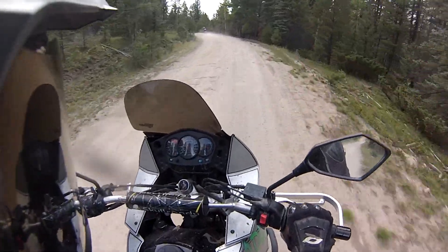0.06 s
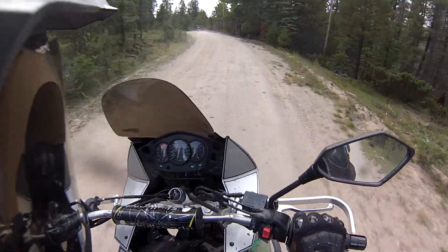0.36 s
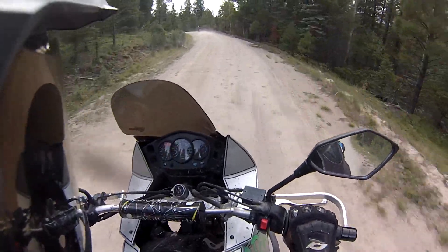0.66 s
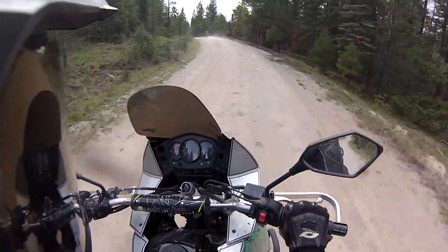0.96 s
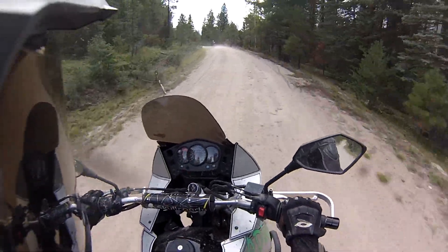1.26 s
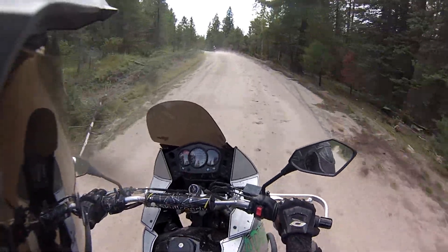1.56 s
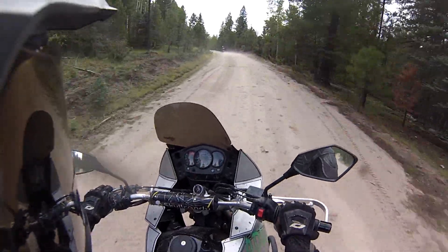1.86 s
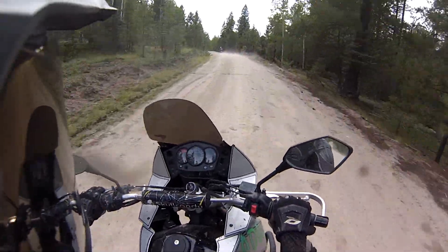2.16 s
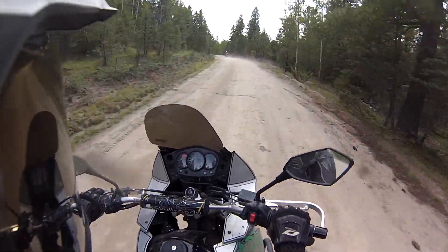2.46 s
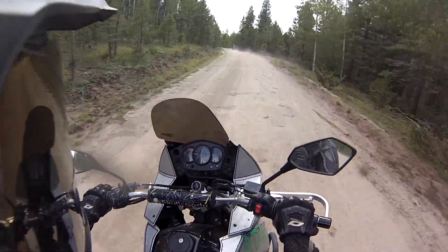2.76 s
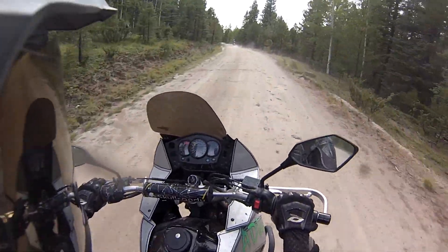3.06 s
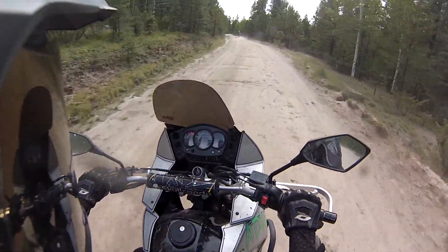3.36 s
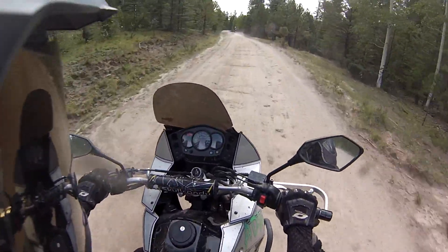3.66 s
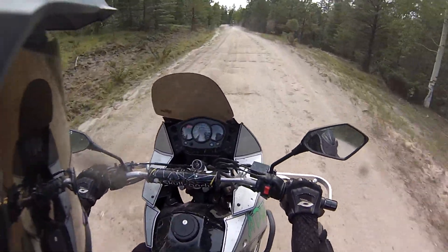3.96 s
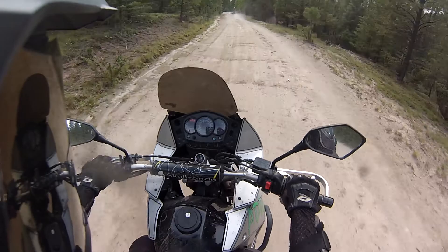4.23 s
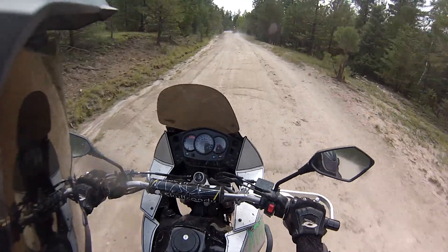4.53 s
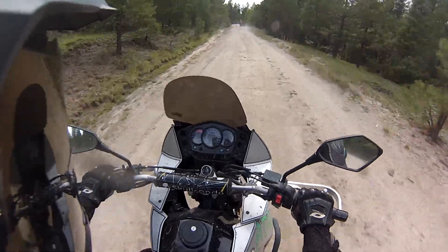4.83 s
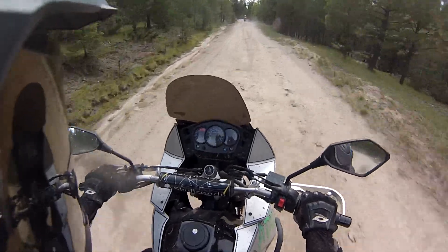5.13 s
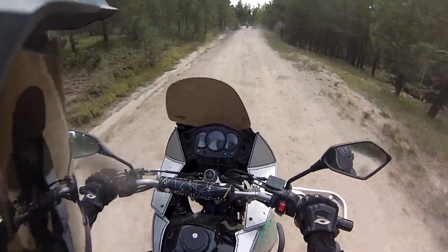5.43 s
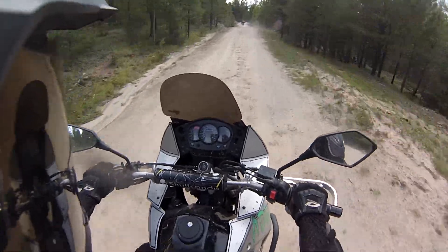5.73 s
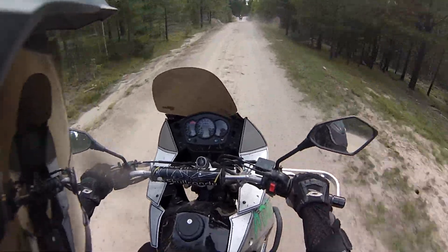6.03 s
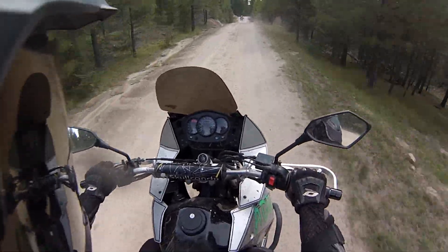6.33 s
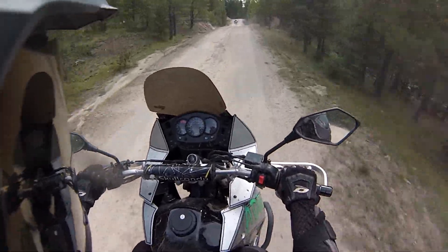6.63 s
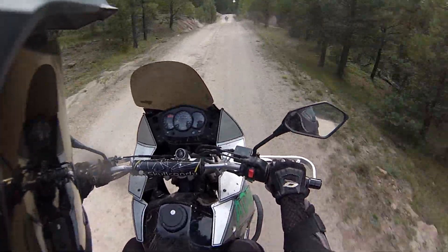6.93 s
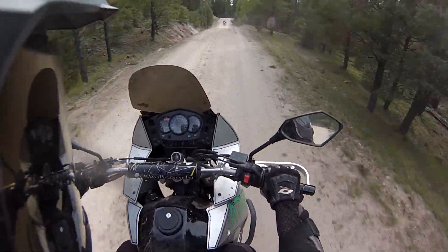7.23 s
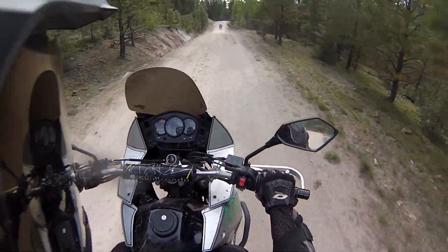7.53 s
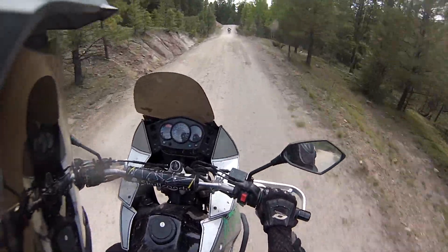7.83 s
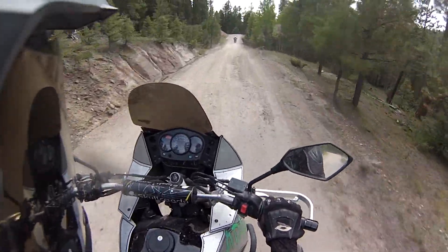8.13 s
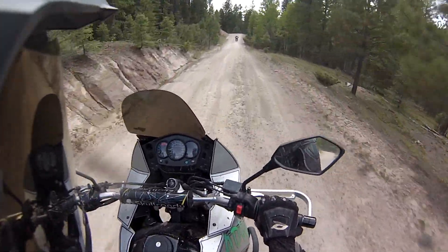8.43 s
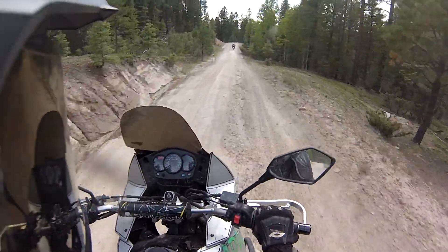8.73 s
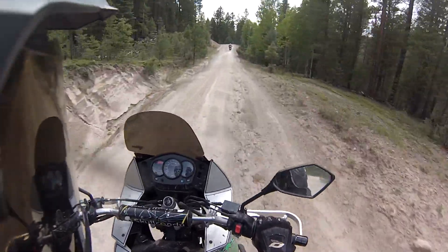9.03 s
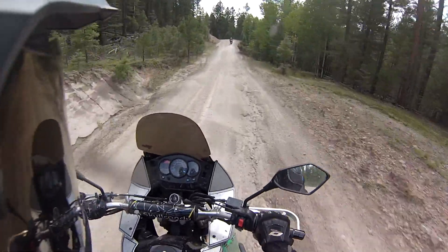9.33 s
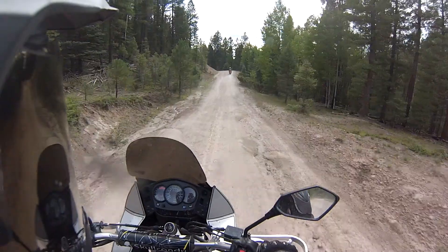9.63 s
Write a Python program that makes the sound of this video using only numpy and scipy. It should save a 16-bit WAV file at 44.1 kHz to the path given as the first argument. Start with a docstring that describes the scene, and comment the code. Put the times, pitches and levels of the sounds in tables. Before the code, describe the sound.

Heard from a rider's helmet, low fluttering wind and a rush of air cover the steady hum of a motorcycle on a dirt road. The wind builds after about three seconds into heavy buffeting with hiss and a hollow tone, then drops back. Short, light plastic rattles and knocks follow over bumps, with a few faint high ticks, before the wind thumps harder once more.

```python
"""A single-cylinder motorcycle cruises along a gravel forest road, heard from a camera on the helmet.
From the start the engine drones at an even pitch, vortices off the windscreen thump the microphone,
and one airflow drives rumble, rush, hiss and a hollow hoot. The wind is strongest from about 3 to 6 s.
Small bright ticks come near 5 s; then, as the air eases, the fairing chatters over rough ground.
Two more ticks sound near 9 s, and the buffeting swells again at the end."""
import sys
import numpy as np
from scipy.fft import rfft, irfft, next_fast_len
from scipy.io import wavfile
from scipy.ndimage import uniform_filter1d, map_coordinates

SR = 44100
rng = np.random.default_rng(int(sys.argv[2]) if len(sys.argv) > 2 else 0)


def pcm_store(signal):
    """Save signal as 16-bit PCM."""
    levels = np.round(np.clip(np.atleast_2d(signal), -1, 1) * 32767)
    wavfile.write(sys.argv[1], SR, levels.astype(np.int16).T)


N = 427329


def amp(db):
    """Amplitude ratio of a level in decibels."""
    return 10 ** (np.asarray(db) / 20)


def unit(x):
    """Normalisation to rms 1."""
    return x / np.sqrt(np.mean(x ** 2) + 1e-20)


def curves(rows):
    """Linear interpolation, per sample, of each column after the time."""
    times, *columns = np.transpose(rows)
    return [np.interp(np.arange(N) / SR, times, column) for column in columns]


def swells(rows):
    """Superposed Gaussian rises, in dB, from rows of (time [s], rise [dB], half-width [s])."""
    t = np.arange(N) / SR
    return sum(db * np.exp(-((t - s) / width) ** 2) for s, db, width in rows)


def wobble(rate):
    """Smooth random modulation: a spline through rate knots a second."""
    return map_coordinates(rng.standard_normal(int(N * rate / SR) + 4), [np.arange(N) * rate / SR])


def filtered(x, response):
    """Linear filtering: the spectrum of x times a frequency response."""
    size = next_fast_len(N + 8192)
    return irfft(rfft(x, size) * response(np.fft.rfftfreq(size, 1 / SR)), size)[:N]


def coloured(x, spectrum):
    """Spectral shaping by (frequency [Hz], level [dB]) points on a log axis, at rms 1."""
    hz, db = np.transpose(spectrum)
    return unit(filtered(x, lambda f: amp(np.interp(np.log(f + 1), np.log(hz), db))))


def noise(spectrum):
    """Gaussian noise with the given spectrum, at rms 1."""
    return coloured(rng.standard_normal(N), spectrum)


def blown(modes):
    """Forced resonance: steep-sided modes driven by white noise, at rms 1."""
    def response(f):
        return sum(amp(db) * np.abs(f * width / (hz * hz - f * f + 1j * f * width)) ** 2
                   for hz, width, db in modes)
    return unit(filtered(rng.standard_normal(N), response))


def steadied(x, seconds):
    """Division by the running rms evens out swells slower than the given time."""
    power = uniform_filter1d(x ** 2, max(int(seconds * SR), 8))
    return x / np.sqrt(np.abs(power) + 1e-6)


def driven(flow_db, cruise_db, exponent):
    """Power law of flow noise: amplitude grows as a power of the flow."""
    return amp(cruise_db + exponent * flow_db)


def airflow():
    """Unsteady flow, in dB over cruise: a drifting mean plus gusts and slight turbulence."""
    # mean flow over the helmet: (time [s], level [dB])
    mean_flow = [(0, -41.0), (1.3, -41.0), (2.8, -35.5), (3.05, -37.0), (4.45, -33.5), (5.0, -38.5),
                 (5.45, -41.5), (6.0, -36.0), (6.55, -46), (7.0, -43.5), (7.25, -48.5), (7.45, -45.5),
                 (8.2, -46.5), (9.55, -43.5), (9.69, -40)]
    # gusts (+) and lulls (-): (time [s], rise [dB], half-width [s])
    gusts = [(2.79, 1.5, 0.067), (4.17, 1, 0.02), (5.16, 2.5, .025), (5.34, 2.5, .02), (5.5, 3.5, 0.053),
             (5.72, 2, 0.017), (6.56, -2, .03), (7.38, 2.5, 0.049), (7.66, 2, .04)]
    cruise_db = -38.5
    mean_db, = curves(mean_flow)
    return mean_db - cruise_db + swells(gusts) + 0.51 * wobble(11)


def engine():
    """Four-stroke cycle: the piston shakes once a turn, the exhaust fires every second turn."""
    # piston drone: (time [s], level [dB])
    drone_levels = [(0, -50), (0.6, -45), (1.5, -38.5), (2.2, -44), (2.7, -36.0), (3.1, -46), (4.0, -40),
                    (4.6, -31), (5.35, -31), (5.9, -36), (6.6, -41.5), (7.15, -32.5), (7.7, -36.5),
                    (8.7, -39), (9.69, -39.5)]
    # exhaust response: (frequency [Hz], relative level [dB])
    exhaust_spectrum = [(20, -27), (35, -9), (70, -1), (105, -11), (140, 4.5), (175, -5.5), (245, -0.5),
                        (315, 0), (385, 1), (500, -15.5), (1200, -9.5), (4000, -55)]
    # steady whirr of gears and tyres: (frequency [Hz], relative level [dB])
    whirr_spectrum = [(200, 5), (620, 2.5), (850, 3), (1200, 2.5), (1650, -6), (2400, 0.5), (3100, -12),
                      (4500, -16.5), (7200, -13), (8500, -22), (10300, -25.5), (10900, -17.5),
                      (11700, -24.5), (15200, -28)]
    crank_hz, pulse_db, puff_db = 69.8, -56, -51
    drone_db, = curves(drone_levels)
    turns = np.cumsum(crank_hz * (1 + .002 * wobble(6))) / SR
    drone = np.sqrt(2) * np.sin(2 * np.pi * turns) * amp(drone_db + wobble(7))
    firings = np.diff(np.floor(turns / 2), prepend=0) * amp(0.39 * wobble(35))
    puffs = uniform_filter1d(firings, int(.008 * SR)) * rng.standard_normal(N)
    exhaust = amp(pulse_db) * coloured(firings, exhaust_spectrum)
    exhaust += amp(puff_db) * coloured(puffs, exhaust_spectrum)
    whirr = amp(-52.5 + 0.3 * np.sin(np.pi * turns) + 0.97 * wobble(150)) * noise(whirr_spectrum)
    return drone + exhaust + whirr


def buffeting():
    """Vortex shedding: the windscreen casts off uneven vortices at a wandering rate, amid turbulence."""
    # wake on the microphone: (time [s], level [dB])
    wake_levels = [(0, -31.5), (1.4, -32.5), (2.2, -33.5), (2.95, -22), (3.6, -23), (4.35, -23.5),
                   (4.7, -19.0), (5.2, -19.5), (5.5, -25), (6.15, -22.5), (6.45, -36.5), (7.0, -27.5),
                   (7.45, -34.5), (8.0, -30), (8.95, -32), (9.69, -19.5)]
    # single big vortices: (time [s], rise [dB], half-width [s])
    thumps = [(1.73, 9, .06), (3.91, 5, 0.035), (4.18, 9.5, 0.04), (4.67, 6, 0.055), (9.28, 9, 0.049),
              (9.61, 8, 0.036)]
    # wake turbulence: (frequency [Hz], relative level [dB])
    wake_spectrum = [(8, -15), (16, 3), (24, 12.5), (34, 8.5), (44, -3), (56, -5), (80, -17), (160, -72)]
    wake_db, = curves(wake_levels)
    shed_hz = 32 + 2 * wobble(9) + 2.43 * wobble(60)
    vortices = np.sqrt(2) * np.sin(2 * np.pi * np.cumsum(shed_hz) / SR) * amp(2.9 * wobble(15))
    turbulence = steadied(noise(wake_spectrum), seconds=0.194)
    return amp(wake_db + swells(thumps)) * (amp(-2.5) * vortices + amp(-5.0) * turbulence)


def helmet_rumble(flow_db):
    """Turbulent wall pressure: eddies on the shell give a rumble and a hollow midrange."""
    # big eddies (+) and calm pockets (-): (time [s], rise [dB], half-width [s])
    eddies = [(.75, -1.5, .12), (2.76, 5, 0.077), (3.03, -3, 0.074), (4.25, 3.5, .14), (5.0, -4, 0.075),
              (5.6, -4.5, .12), (5.87, 0, .06), (6.35, 3.5, 0.11), (7.06, 7, 0.096), (7.22, -4, 0.036)]
    # low and middle bands on the shell: (frequency [Hz], relative level [dB])
    rumble_spectrum = [(35, -18), (50, -4), (66, -5.5), (85, 1.5), (102, -0.5), (125, -6.5), (150, -18.5),
                       (220, -21.5), (500, -83)]
    hollow_spectrum = [(90, -26), (150, -7.5), (178, 0), (205, -2.5), (255, -0.5), (325, -9), (400, -10),
                       (480, -8), (540, -12.5), (600, -9), (680, -17), (820, -19), (1500, -74),
                       (4000, -100)]
    eddy_db = swells(eddies)
    rumble = driven(flow_db, cruise_db=-35, exponent=0.79) * amp(eddy_db + 1.33 * wobble(9))
    rumble *= steadied(noise(rumble_spectrum), seconds=0.13)
    hollow = driven(flow_db, cruise_db=-42.5, exponent=0.7) * amp(0.4 * eddy_db + 0.55 * wobble(12))
    hollow *= noise(hollow_spectrum)
    return rumble + hollow


def cavity_hoot(flow_db):
    """Cavity resonance: a hollow hoots in the flow and surges when it catches the air."""
    # cavity mode: (frequency [Hz], bandwidth [Hz], relative level [dB])
    cavity_modes = [(385.5, 34, 0)]
    # surges: (time [s], rise [dB])
    surges = [(.1, 7), (.35, 4.5), (2.34, 4), (2.78, 7), (2.87, 6), (2.97, 9), (3.32, 11), (3.97, 5.5),
              (4.24, 8.5), (4.78, 4.5), (4.91, 8), (5.15, 7), (5.34, 4), (7.1, 10.5), (7.91, 4)]
    half_width_s = 0.034
    surge_db = swells([(s, db, half_width_s) for s, db in surges])
    gain = driven(flow_db, cruise_db=-45.5, exponent=0.57) * amp(surge_db + 1.44 * wobble(18))
    return gain * steadied(blown(cavity_modes), seconds=0.12)


def slipstream(flow_db):
    """Aerodynamic noise: rushing air rings the housing; faster flow hisses and sings at gap and edge."""
    # broadband air noise: (frequency [Hz], relative level [dB])
    rush_spectrum = [(250, -17.5), (600, -15.5), (720, -8), (820, -11.5), (960, -3), (1200, 1), (1500, -2),
                     (1680, -1), (1950, -1.5), (2300, -1), (2650, -9), (3400, -19), (4500, -24.5),
                     (14000, -89)]
    hiss_spectrum = [(1500, -20), (2900, 9.5), (3500, 5.5), (4300, 0), (4800, 2.5), (5500, 0), (6200, 1.5),
                     (7100, -0.5), (8400, -10), (9500, -10.5), (11300, -17), (12500, -21), (15000, -29)]
    # air-driven resonances: (frequency [Hz], bandwidth [Hz], relative level [dB])
    housing_modes = [(1360, 230, -0.5), (1967, 69, -3.5), (2455, 220, -1), (3863, 250, -12.5),
                     (4730, 400, -28), (6030, 300, -24)]
    gap_modes = [(2510, 210, 0)]
    edge_modes = [(10000, 730, 0)]
    # slow drift of the hiss against the flow: (time [s], level [dB])
    treble_levels = [(0, .3), (1.3, 0), (2.4, 1.5), (3.0, 0), (4.6, 0.5), (4.95, -2), (5.5, -1),
                     (6.2, -2.5), (6.6, -3), (7.0, -2), (8.2, -2), (8.75, 1.5), (9.69, -0.5)]
    # flares of the edge whistle: (time [s], rise [dB], half-width [s])
    flares = [(4.33, 8, .03), (4.57, 14, .04), (4.7, 9, .04)]
    treble_db, = curves(treble_levels)
    flutter = wobble(40)
    rush = amp(flow_db - 40.0 + 0.81 * flutter) * noise(rush_spectrum)
    ring = amp(flow_db - 45.5 + 1.93 * wobble(25)) * blown(housing_modes)
    # the narrow gap stands out only in the strongest flow
    singing = driven(flow_db, cruise_db=-53, exponent=1.77) * amp(1.7 * wobble(22)) * blown(gap_modes)
    hiss = amp(treble_db + 0.78 * flutter + 1.04 * wobble(300)) * noise(hiss_spectrum)
    hiss *= driven(flow_db, cruise_db=-52, exponent=1.2)
    whistle = amp(swells(flares) + 1.7 * flutter) * blown(edge_modes)
    whistle *= driven(flow_db, cruise_db=-80, exponent=1.8)
    return rush + ring + singing + hiss + whistle


def ticks():
    """Damped free vibration: each tick is one high mode, with a little noise, decaying exponentially."""
    # small bright ticks: (time [s], level [dB], frequency [Hz])
    tick_events = [(4.91, -60, 14400), (5.165, -57, 10000), (5.413, -49, 9990), (8.943, -50, 10100),
                   (8.996, -56, 14500)]
    attack_s, t60_s = 0.0014, 0.035
    out, t = np.zeros(N + SR), np.arange(SR // 10) / SR
    for s, db, hz in tick_events:
        ring = np.sin(2 * np.pi * hz * t) + .25 * rng.standard_normal(len(t))
        envelope = amp(db - 60 * t / t60_s) * (1 - np.exp(-t / attack_s))
        out[round(s * SR):][:len(t)] += ring * envelope
    return out[:N]


def bumps():
    """Impact excitation: each rough patch knocks the chassis and sets the plastic fairing chattering."""
    # rough patches: (time [s], chatter level [dB], knock level [dB], half-width [s])
    patches = [(5.337, -56, -53, .02), (6.98, -50, -43, 0.035), (7.075, -55, -49, 0.034),
               (7.384, -54, -47, 0.05), (7.888, -55, -52, 0.055), (8.815, -60, -38, .025)]
    # structural modes: (frequency [Hz], bandwidth [Hz], relative level [dB])
    fairing_modes = [(2900, 380, 2), (3680, 500, 0), (5000, 760, -17), (6400, 680, -11)]
    chassis_modes = [(275, 89, -6), (394, 47, 0)]
    t = np.arange(N) / SR
    chatter_gain, knock_gain = np.zeros(N), np.zeros(N)
    for s, chatter_db, knock_db, width in patches:
        jolt = np.exp(-((t - s) / width) ** 2)
        chatter_gain += amp(chatter_db) * jolt
        knock_gain += amp(knock_db) * jolt
    chatter = unit(amp(4 * wobble(160)) * blown(fairing_modes))
    return chatter_gain * chatter + knock_gain * blown(chassis_modes)


def scene():
    """Superposition: every source reaches the one microphone directly."""
    flow_db = airflow()
    cruising = engine() + buffeting() + helmet_rumble(flow_db) + cavity_hoot(flow_db)
    return (cruising + slipstream(flow_db) + bumps() + ticks())[None]


def record(dry):
    """Band limiting: the camera keeps nothing above its cutoff."""
    cutoff_hz = 15250
    return np.array([filtered(channel, lambda hz: hz < cutoff_hz) for channel in dry])


dry = scene()
out = record(dry)
pcm_store(out)
```